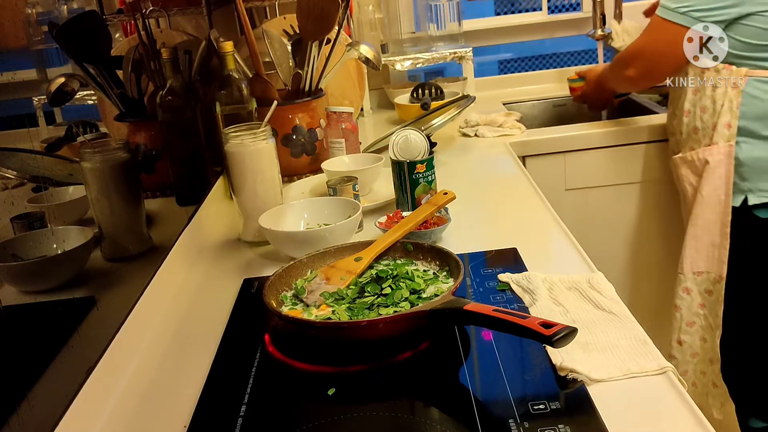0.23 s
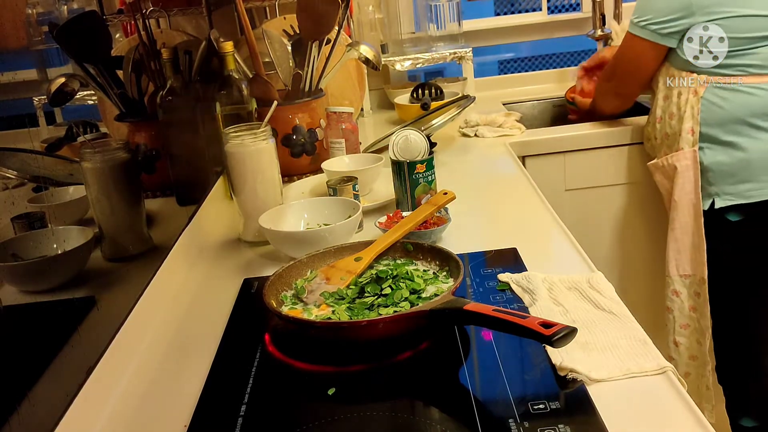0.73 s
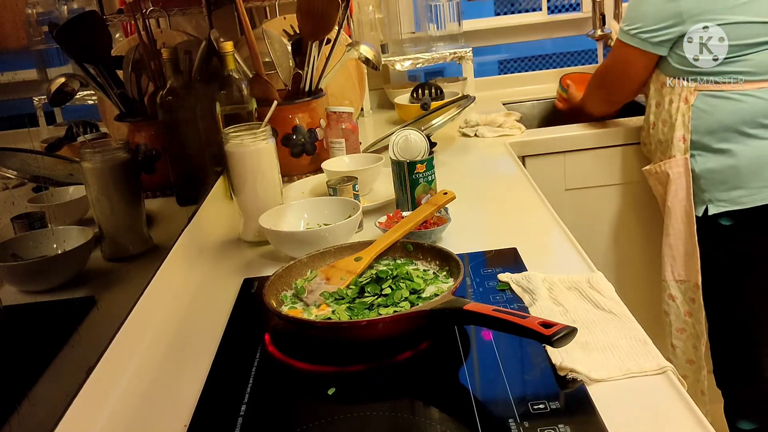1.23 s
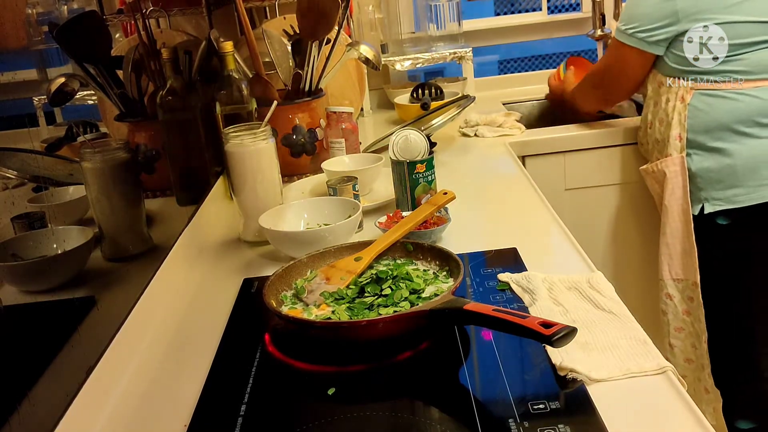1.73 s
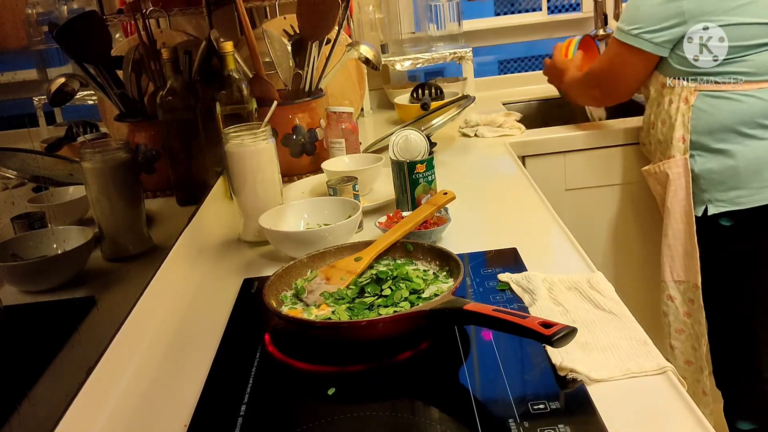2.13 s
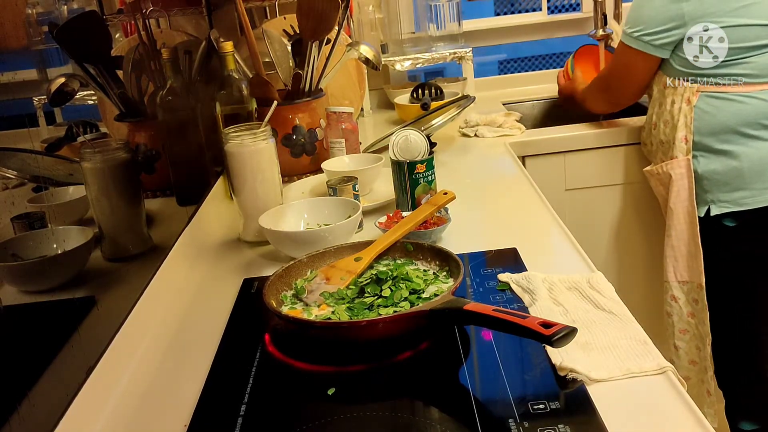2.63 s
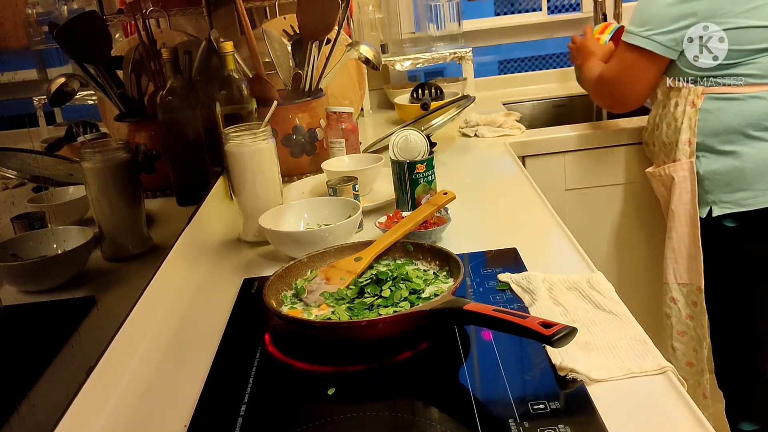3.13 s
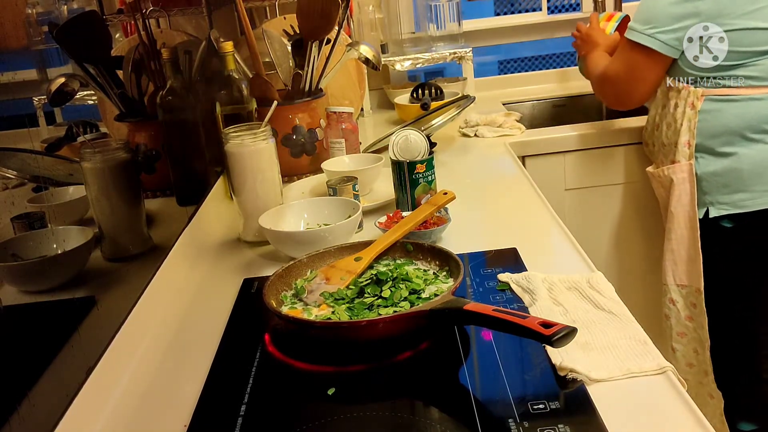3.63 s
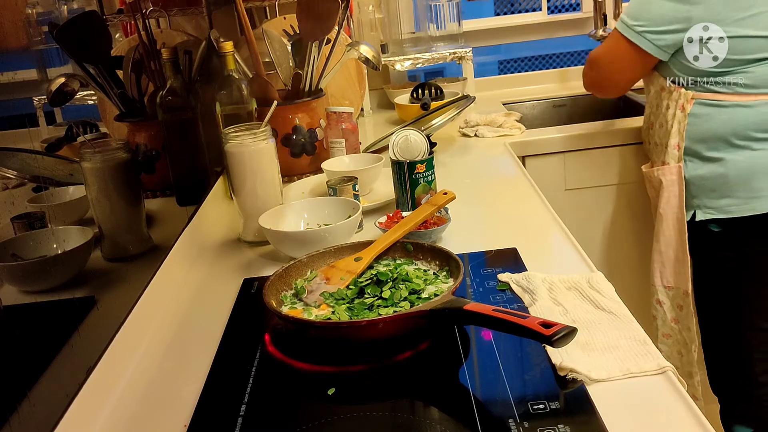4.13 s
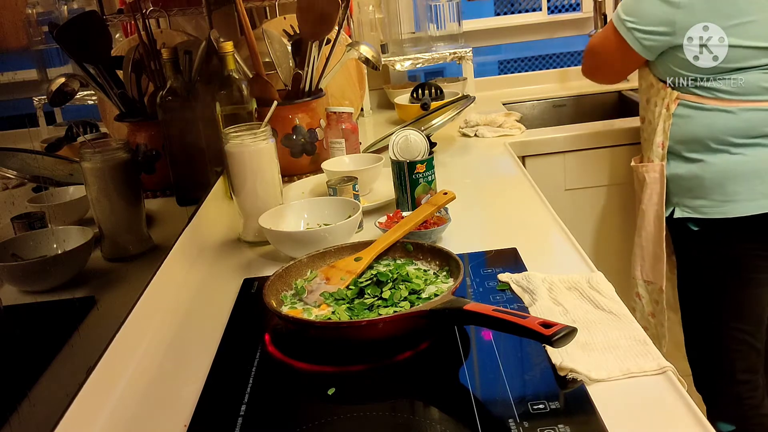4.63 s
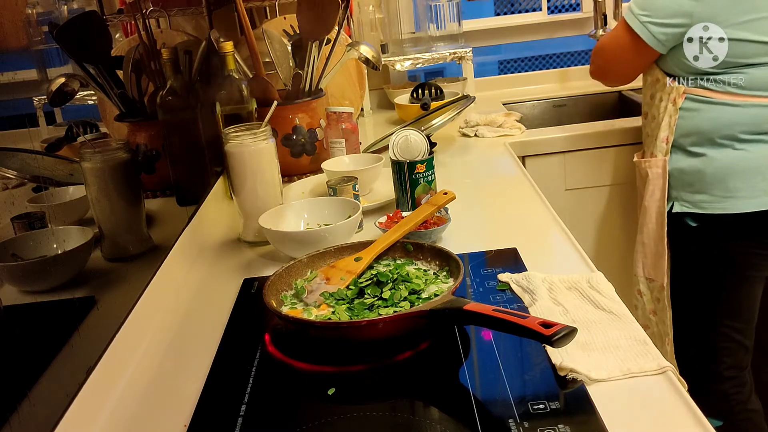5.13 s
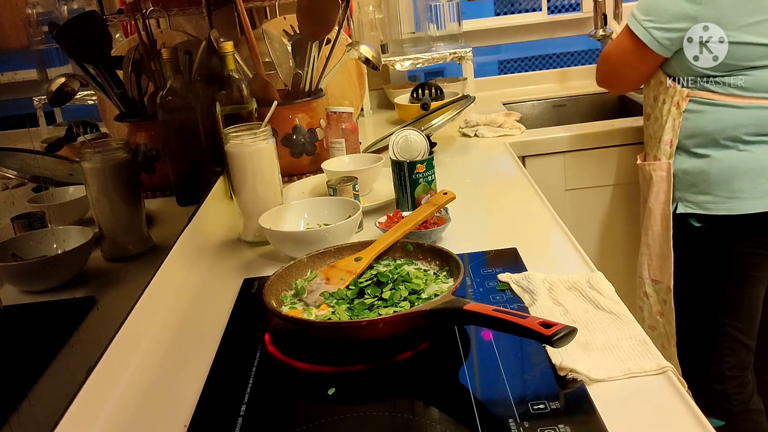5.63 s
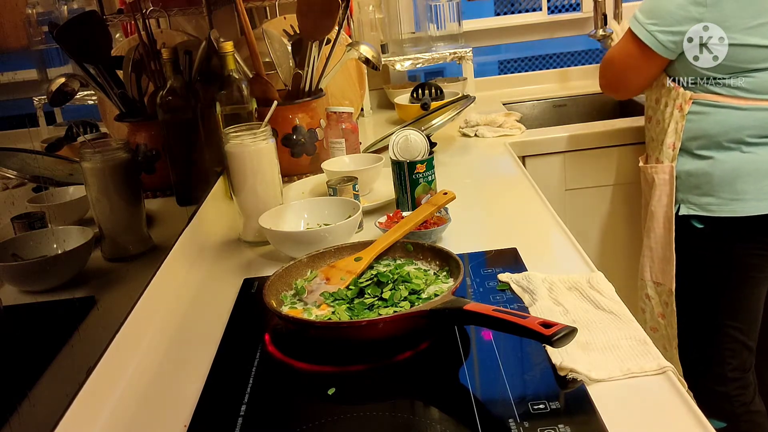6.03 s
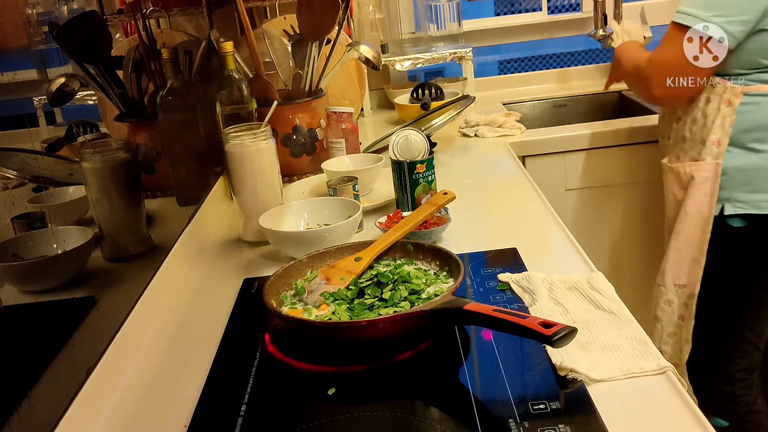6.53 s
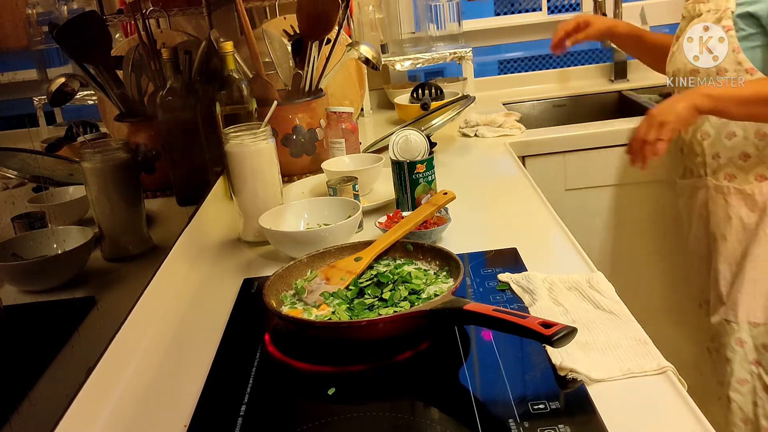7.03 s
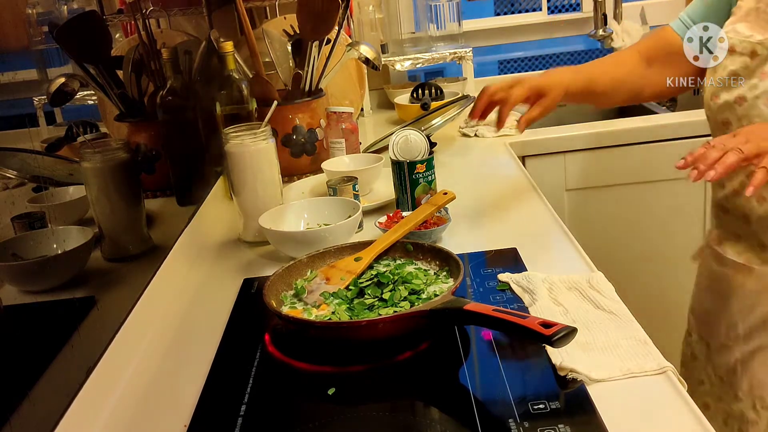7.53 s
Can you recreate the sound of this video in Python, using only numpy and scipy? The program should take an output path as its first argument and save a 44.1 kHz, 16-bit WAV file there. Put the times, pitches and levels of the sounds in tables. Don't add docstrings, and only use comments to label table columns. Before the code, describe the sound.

Fine water spray and coarse splashes surge and dip as hands turn in the stream at a sink, with faint drain gurgle. A sharp, hollow steel knock comes almost at once, then padded cupboard thuds. After the tap closes, quiet hum and airy wash remain, broken by a dish rattling on the counter, short steel clinks and a few faint ticks. Small room, slightly distant stereo microphone, no extreme highs.

```python
import sys
import numpy as np
from scipy import signal
from scipy.fft import rfft, irfft, next_fast_len
from scipy.io import wavfile
from scipy.ndimage import uniform_filter1d

SR = 44100
rng = np.random.default_rng(int(sys.argv[2]) if len(sys.argv) > 2 else 0)


def how_loud(loudness_db):
    steps = np.asarray(loudness_db, float) / 20
    return 10 ** steps


def dump(signal):
    limited = np.clip(np.atleast_2d(signal).T, -1, 1)
    pcm = np.round(limited * 32767).astype(np.int16)
    wavfile.write(sys.argv[1], SR, pcm)


N = 343627


def evened(x):
    return x / np.sqrt(np.mean(x ** 2) + 1e-20)


def read(points, hz):
    f, value = np.transpose(points)
    return np.interp(np.log(hz + 1), np.log(f + 1), value)


def add(mix, start_s, sound):
    part = mix[:, round(start_s * SR):][:, :sound.shape[1]]
    part += sound[:, :part.shape[1]]


def coloured(x, gain):
    size = next_fast_len(x.shape[-1])
    spectrum = rfft(x, size) * gain(np.fft.rfftfreq(size, 1 / SR))
    return irfft(spectrum, size)[..., :x.shape[-1]]


def bell(hz, centre_hz, octaves):
    return np.exp(-.5 * (np.log2((hz + 1) / centre_hz) / octaves) ** 2)


def drift(fastest_hz):
    return evened(coloured(rng.standard_normal(N), lambda hz: (hz > 0) / (1 + (hz / fastest_hz) ** 2)))


def noise(spectrum, grain_db=0., per_s=4000):
    drop_gain = how_loud(grain_db * np.minimum(rng.exponential(1, (2, N)), 4))
    drops = drop_gain * (rng.random((2, N)) < per_s / SR)
    raw = rng.standard_normal((2, N)) * (0.38 + drops)
    return evened(coloured(raw, lambda hz: how_loud(read(spectrum, hz))))


def burst(length, centre_hz, octaves):
    return evened(coloured(rng.standard_normal((2, length)), lambda hz: bell(hz, centre_hz, octaves)))


# (frequency [Hz], lead [rad])
PORT_LEAD = [(50, -.2), (100, -.28), (250, -.6), (600, -.6), (850, .4), (1200, 2.9)]


def port_lead(hz):
    return read(PORT_LEAD, hz)


# (time [s], stream level [dB], share breaking on hands and fruit [0-1])
TAP_FLOW = [(0, -67, 0.5), (.09, -81.5, 0.1), (.24, -52.5, 0.82), (.5, -50, 0.56), (.65, -49.5, 0.4),
            (.82, -59, 0.78), (1.08, -59, .8), (1.18, -53.5, 0.64), (1.44, -49.5, 0.6), (1.55, -61.5, 0.87),
            (1.75, -52, 0.6), (1.965, -56, 0.82), (2.0, -44, 0.51), (2.43, -48, 0.6), (2.91, -59.5, 0.83),
            (2.98, -45.5, 0.58), (3.78, -47, 0.07), (3.95, -84.5, 0.5)]
# (time [s], peak level [dB], rise [s])
GUSHES = [
    (.39, -41, 0.1),
    (.95, -51, 0.16),
    (1.05, -52.5, .12),
    (1.83, -48.5, 0.3),
    (1.996, -40, 0.008),
    (2.28, -46, .05),
    (3.091, -38.5, 0.056),
    (3.98, -50, 0.0064),
]
GUSH_FALL_DB_PER_S = 151


def stream():
    t = np.arange(N) / SR
    s, flow_db, hands = np.transpose(TAP_FLOW)
    db = np.interp(t, s, flow_db)
    for peak_s, peak_db, rise_s in GUSHES:
        rise_db = 20 * (peak_s - t) / rise_s
        fall_db = GUSH_FALL_DB_PER_S * (t - peak_s)
        db = np.maximum(db, peak_db - np.maximum(rise_db, fall_db))
    return db, np.clip(np.interp(t, s, hands), 0, 1)


# (frequency [Hz], density [dB/Hz])
SPRAY_SPECTRUM = [(2060, -46.5), (3500, -20.5), (4270, -21.5), (5340, -14), (6540, 0), (6920, 1),
                  (7660, -2.5), (7960, -19.5), (8070, 3.5), (10500, -44.5), (17800, -120)]
# (frequency [Hz], density [dB/Hz])
SPLASH_SPECTRUM = [(700, -31.5), (1400, -2.5), (2500, -2), (4500, -0.5), (6000, -3), (8000, -8)]
# (frequency [Hz], density [dB/Hz])
GURGLE_SPECTRUM = [(150, -17.5), (300, 2.5), (600, -9), (1000, -7), (1800, -26.5)]
SPLASH_FREE_DB, SPLASH_HANDS_DB = -26.5, -2
GURGLE_DB, GURGLE_FOLLOWS = -65, 0.31
STREAM_DB, DRAINED_S = -47.5, 4.13


def water():
    db, hands = stream()
    wet = np.clip((DRAINED_S - np.arange(N) / SR) / 0.17, 0, 1)
    spray = noise(SPRAY_SPECTRUM, 0.98) * how_loud(db + 1.1 * drift(25))
    splash_db = db + SPLASH_FREE_DB + (SPLASH_HANDS_DB - SPLASH_FREE_DB) * hands
    splash = noise(SPLASH_SPECTRUM, 1.1, 2500) * how_loud(splash_db + 3.0 * drift(6.2))
    gurgle_db = GURGLE_DB + GURGLE_FOLLOWS * (db - STREAM_DB)
    gurgle = noise(GURGLE_SPECTRUM, 1.6, 900) * how_loud(gurgle_db + 0.52 * drift(8))
    return wet * (spray + splash + gurgle)


# (time [s], peak level [dB], centre [Hz], spread
WATER_SLAPS = [(.221, -58, 6700, .65), (.267, -34, 4500, 1.5), (.359, -37.5, 1410, 0.61),
               (.364, -41, 5960, 1.3), (.914, -44.5, 5500, 1.23), (1.038, -48, 4000, 0.51),
               (1.151, -36.5, 6830, 0.46), (1.281, -45, 6800, 0.41), (1.82, -53, 6500, .63),
               (1.955, -35, 6000, 1.), (1.992, -30, 7000, 0.4), (1.996, -37, 1900, 0.3),
               (1.996, -38, 3800, .3), (2.0, -27, 7400, .04), (2.19, -50, 1900, .4), (2.46, -46, 786, .3),
               (3.575, -39.5, 1400, 0.87), (2.361, -32.5, 3500, 1.6), (2.951, -31, 4300, 0.3),
               (2.954, -41.5, 2210, .4), (3.086, -33.5, 6000, 0.33), (3.097, -35, 6800, .4),
               (3.147, -39, 1900, 0.86), (3.745, -31.5, 6960, 0.32), (3.975, -41.5, 6470, 0.54),
               (.62, -25, 505, 1.3), (2.19, -34.5, 450, 0.66)]
# (time [s], peak level [dB], centre [Hz], spread [octaves])
COUNTER_TICKS = [
    (6.3, -58, 6000, .62),
    (5.79, -43.5, 7500, .39),
    (6.678, -54.5, 6900, .45),
    (6.834, -43, 5800, .56),
    (6.87, -57, 4300, 0.63),
    (7.25, -66, 4000, .8),
    (7.066, -51, 7600, 0.39),
    (6.02, -33.5, 5000, 0.53),
]
SLAP_T60_S, TICK_T60_S = 0.19, 0.35


def slaps(rows, t60_s):
    out, t = np.zeros((2, N)), np.arange(6000) / SR
    for s, db, centre_hz, octaves in rows:
        envelope = how_loud(db - 17.5 - 60 * t / t60_s) * np.minimum(t / 0.0028, 1)
        add(out, s - .002, burst(len(t), centre_hz, octaves) * envelope)
    return out


def struck(modes, blows, body, clatter_t60_s, rock_db):
    out, t = np.zeros((2, N)), np.arange(SR // 2) / SR
    hz, mode_db, t60_s = np.transpose(modes)[:, :, None]
    rocking = rng.standard_normal((len(hz), len(t)))
    for _ in range(2):
        rocking = uniform_filter1d(rocking, size=200)
    fading = how_loud(mode_db - 60 * t / t60_s + rock_db * evened(rocking))
    near = fading * np.sin(2 * np.pi * hz * t)
    far = fading * np.cos(2 * np.pi * hz * t - port_lead(hz)) * rng.choice([-1, 1], hz.shape)
    signs = rng.choice([-1, 1], len(hz))
    for s, db, centre_hz, octaves, clatter_db, free_s in blows:
        weights = bell(hz[:, 0], centre_hz, octaves) * signs
        damped = how_loud(-60 * np.maximum(t - free_s, 0) / .055)
        ringing = np.array([weights @ near, weights @ far]) * damped
        colour = lambda f: how_loud(read(body, f)) * bell(f, centre_hz, octaves + 1.6)
        clatter = evened(coloured(rng.standard_normal((2, len(t))), colour))
        sound = ringing + clatter * how_loud(clatter_db - 60 * t / clatter_t60_s)
        add(out, s, how_loud(db) * sound * np.minimum(500 * t, 1))
    return out


# (frequency [Hz], level [dB], t60 [s])
SINK_MODES = [(101.3, -8, .3), (179, -10.5, 0.9), (229, -1, 0.1), (262, -4, .14), (320, 3, 0.15),
              (412, -5, 0.15), (470, -14, 0.083), (506, -14, 0.5), (533, -3, .12), (600, 2, .19),
              (653, -13, 0.089), (703, -13, 0.22), (750, -11, .14), (816.6, -19, 0.4), (880, -15, .12),
              (950, -26, 0.08), (1090, -21, .2), (1190, -15.5, .12), (1140, -12, .08), (1245, -9, 0.18),
              (1300, -10, .09), (1754, -8, .1), (1918, -16, .13), (1920, -32, .9), (2150, -18.5, .08),
              (2370, -22, .1), (2800, -19, .12), (1650, -20, .08), (2050, -29, .1), (2550, -34, .08),
              (3000, -31, .1), (3500, -28, .08), (3860, -36, .08),
              (3215, -27, .15), (3258, -24, .16)]
# (frequency [Hz], density [dB/Hz])
SINK_BODY = [(47, -42.5), (80, -6.5), (303, 0), (375, -30.5), (596, -1), (965, -20), (1240, -4),
             (1480, -18.5), (1860, -7), (2090, -13), (4520, -22.5), (6780, -11), (8070, -26), (10500, -73),
             (17800, -120)]
# (time [s], level [dB], favoured pitch [Hz], spread [octaves], clatter [dB])
SINK_KNOCKS = [(.618, -35, 610, 3.4, -6.5), (.6234, -35.5, 1300, 0.37, -4), (.629, -28.5, 296, 2.6, -5),
               (.6424, -31.5, 560, 1.5, -9), (.622, -24, 3250, 0.05, -43), (.631, -30, 321, .06, -30),
               (.636, -33, 414, .05, -30), (.676, -34, 3215, .005, -40), (.7, -40, 3215, .01, -40),
               (.6523, -32.5, 1260, 0.25, -13), (.666, -29, 1918, 0.04, -33), (.672, -43, 516, 0.75, -3)]
SINK_FREE_S = 0.32


def sink_knocks():
    blows = [(*row, SINK_FREE_S) for row in SINK_KNOCKS]
    return struck(SINK_MODES, blows, SINK_BODY, 0.086, 1.0)


# (time [s], peak level [dB], ring [Hz], t60 [s], rattle re ring [dB])
PANEL_BUMPS = [(.268, -59.5, 1275, 0.51, -26), (.325, -54, 612, .15, -17), (.357, -47, 1390, .06, -7),
               (.37, -46, 304, 0.2, 2.5), (1.531, -53, 1054, .08, 2), (2.2, -49, 826, 0.14, -12),
               (2.44, -48, 500, .15, -8), (2.462, -49, 835, 0.11, -11), (3.575, -47, 660, 0.14, -7),
               (3.56, -41, 262, 0.28, -7), (2.97, -52, 218, 0.27, 0), (1.178, -48, 174.3, 0.26, -12.5),
               (1.24, -47, 162, 0.37, -3), (1.649, -34, 173.6, 0.15, -21), (2.02, -39, 237, 0.14, -10),
               (2.077, -36.5, 82.2, 0.34, -19), (2.176, -41, 234, 0.089, 0), (2.18, -45, 603, 0.19, -2),
               (2.2, -48, 36, 0.39, -23), (2.436, -26.5, 122.5, 0.14, -24.5), (2.457, -42, 65, 0.12, -13),
               (2.86, -46, 72.8, 1, -27), (3.079, -52.5, 151, 0.097, -7), (3.564, -38, 166.4, 0.21, -1.5),
               (3.568, -30, 88.1, 0.21, -13), (3.621, -37, 111.8, 0.098, -18), (4.763, -41, 72, 0.15, -26),
               (5.042, -33, 164.3, 0.083, -7), (5.348, -40, 168.3, 0.17, -10),
               (6.024, -40, 161, 0.21, -4.5), (7.328, -46.5, 242, 0.1, -0.5)]
RATTLE_ABOVE_HZ = 110


def bumps():
    out, t = np.zeros((2, N)), np.arange(12000) / SR
    for s, db, ring_hz, t60_s, rattle_db in PANEL_BUMPS:
        rattle = burst(len(t), ring_hz + RATTLE_ABOVE_HZ, 1.0) * how_loud(rattle_db - 60 * t / 0.19)
        phases = [[0], [np.pi / 2 - port_lead(ring_hz)]]
        ring = np.sin(2 * np.pi * ring_hz * t + phases)
        envelope = how_loud(db - 3.0 - 60 * t / t60_s) * (1 - np.exp(-t / 0.0052))
        add(out, s - .005, (ring + rattle) * envelope)
    return out


# (frequency [Hz], level [dB], t60 [s])
DISH_MODES = [(644, -15, .04), (714, -4, .12), (802, -7, .08), (860, -5, .08), (1050, -12, .08),
              (1160, -11, .06), (1750, -12, .08), (930, -6, 0.1), (986, -2, 0.12), (1094, -7, .1),
              (1900, -3, 0.12), (2620, -20, .06), (520, -8, .1), (3310, -14, .3), (3450, -22, .07)]
# (time [s], level [dB], favoured pitch [Hz], spread [octaves], clatter [dB])
DISH_SETS = [(4.99, -52.5, 2200, .4, -10), (4.993, -46, 800, 0.45, -10.5), (5.022, -55, 800, .3, -11),
             (5.037, -46.5, 1450, 0.96, -1), (5.041, -36, 900, .3, -13), (5.055, -38, 930, .2, -18),
             (5.042, -47, 3300, .1, -12), (5.058, -46, 3300, .15, -9), (5.064, -53, 1900, .1, -12),
             (5.1, -46, 900, .2, -18), (5.079, -33, 950, 0.22, -22), (5.111, -46.5, 1010, .17, -14.5),
             (5.126, -48, 1050, .2, -18), (5.142, -43, 940, 0.098, -21), (5.16, -51, 950, .3, -18),
             (5.185, -53, 950, .3, -20), (5.3, -50, 900, 1.5, 0), (5.312, -47, 750, .4, -9),
             (5.328, -52, 900, .2, -14), (5.358, -48, 1750, .1, -14), (6.016, -48.5, 760, 3.3, -0.5),
             (6.02, -41, 715, .2, -13), (6.04, -41, 850, 0.4, -13), (6.058, -48, 720, 0.55, -8),
             (6.075, -48, 750, .25, -12), (6.09, -50, 700, 0.25, -11)]
# (frequency [Hz], density [dB/Hz])
COUNTER_CLATTER = [(180, -36), (300, -4), (843, -2), (967, -6), (3390, -17.5), (3680, -19.5), (6470, -12.5),
                   (6750, 0), (8070, -19.5), (10500, -57), (17800, -120)]
DISH_FREE_S = 0.014


def dish_sets():
    blows = [(*row, DISH_FREE_S) for row in DISH_SETS]
    return struck(DISH_MODES, blows, COUNTER_CLATTER, 0.22, 2.0)


# (frequency [Hz], level [dB], t60 [s])
BLADE_MODES = [(1800, -8, 0.084), (2353, -4.5, 0.5), (2395, -13, .2), (2750, 1, 0.16), (2318, -13, .2),
               (4050, -10, .17), (3300, -9.5, .3), (4350, -10, 0.1), (4290, -7, .4), (4430, -12.5, .15),
               (4540, -8, .25), (4680, -9, .25), (5017, -9, .16), (4974, -12, .5), (5250, -20, .15),
               (5490, -15, .3), (1922, -3, .15), (5835, -13, .25), (6300, -12, .3), (6422, -8, 0.38),
               (6578, -4.5, 0.23), (6686, -12, .22), (6895, -6.5, 0.2), (7050, -21, .3), (7168, -12, .3),
               (7500, -5, 0.27), (7740, -7, .2)]
# (time [s], level [dB], favoured pitch [Hz], spread [octaves], time to next contact [s])
CUTLERY_CLINKS = [(5.092, -51, 2340, .06, 0.02), (5.132, -60, 2340, .06, 0.017),
                  (5.162, -68, 2340, .06, .008), (5.272, -55, 2350, 0.11, 0.015),
                  (5.268, -61, 4350, .04, .015), (5.3, -53, 5490, .05, .03), (5.312, -61, 2350, .06, .012),
                  (5.346, -42.5, 4400, 0.2, .035), (5.347, -48, 2500, .5, 0.039),
                  (5.355, -33, 5017, 0.008, 0.024), (5.346, -43.5, 7500, .06, .055),
                  (5.35, -39, 6460, .025, 0.042), (5.355, -41, 2353, .03, .01),
                  (5.373, -43, 2353, .05, 0.035), (5.3, -48, 3300, .03, .035),
                  (5.36, -36, 6500, .025, 0.032), (5.386, -50.5, 4700, 0.37, .1),
                  (5.39, -54, 7100, 0.1, .04), (5.412, -49.5, 6400, .06, .09), (5.42, -50, 4200, .1, .1),
                  (5.428, -43, 6578, 0.036, 0.015), (5.43, -48, 2353, 0.062, .06),
                  (5.44, -51.5, 5100, 0.13, .11), (5.525, -67, 2353, .06, .04),
                  (5.66, -58.5, 2353, 0.12, .065), (5.655, -62, 4350, .05, .05),
                  (5.75, -72, 2353, .06, .05), (5.845, -67, 2353, .08, .03), (5.972, -60.5, 2353, .1, .021),
                  (6.016, -47, 3300, .05, 0.073), (6.019, -41.5, 6895, 0.031, .008),
                  (6.03, -29.5, 6895, 0.01, 0.012), (6.02, -46.5, 1922, 0.05, .03),
                  (6.052, -38, 4350, 0.015, .085), (6.057, -41.5, 2353, .04, 0.08),
                  (6.19, -76, 2353, .05, .03), (6.078, -50, 4050, 0.03, .015), (6.03, -46, 4974, .01, 0.16),
                  (6.095, -48.5, 4974, .01, .06), (6.075, -46, 6690, .03, .07),
                  (6.025, -50, 7740, .03, .16)]
CLINK_CLATTER_DB, CLATTER_DB_PER_HALVING = 4, -3.5


def cutlery_clinks():
    blows = []
    for s, db, hz, octaves, free_s in CUTLERY_CLINKS:
        clatter_db = CLINK_CLATTER_DB - CLATTER_DB_PER_HALVING * np.log2(octaves)
        blows.append((s, db, hz, octaves, clatter_db, free_s))
    return struck(BLADE_MODES, blows, COUNTER_CLATTER, .16, 2.2)


# (frequency [Hz], t60 [s])
ROOM_DECAY = [(100, 0.37), (500, 0.23), (2000, 0.3), (8000, 0.23)]


def room(x, wet_db):
    taps = np.zeros((2, SR // 2))
    at = np.arange(120, SR // 2 - 20, 20) + rng.integers(0, 20, (2, (SR // 2 - 121) // 20))
    np.put_along_axis(taps, at, rng.choice([-1., 1.], at.shape), 1)
    hz, t, z = signal.stft(taps, SR, nperseg=256)
    decay = how_loud(-60 * t / read(ROOM_DECAY, hz)[:, None])
    tail = signal.istft(z * decay, SR, nperseg=256)[1]
    tail = tail / np.linalg.norm(tail[0])
    return x + how_loud(wet_db) * signal.fftconvolve(x, tail, axes=1)[:, :N]


# (time [s], level [dB])
HUM_LEVEL = [(0, -48.5), (.05, -43.5), (.59, -43.5), (.67, -31.5), (.8, -44.5), (1.55, -45.5),
             (1.69, -40.5), (1.84, -47.5), (2.03, -45.5), (2.12, -39), (2.36, -48), (2.45, -40),
             (2.56, -51.5), (2.69, -46.5), (3.43, -43.5), (3.53, -49), (3.61, -39.5), (3.76, -45)]
HUM_HZ = 100.1


def hum():
    turns = np.cumsum(HUM_HZ + 0.24 * drift(0.51)) / SR
    db = np.interp(np.arange(N) / SR, *np.transpose(HUM_LEVEL)) - 3.0
    return np.sqrt(2) * np.sin(2 * np.pi * turns) * how_loud(db + 0.26 * drift(9.8))


# (frequency [Hz], density [dB/Hz])
AIR_SPECTRUM = [(90, -20), (130, -2.5), (184, 0.5), (250, -2.5), (340, -4.5), (470, -6.5), (540, -6.5),
                (605, -2.5), (680, -10.5), (850, -11.5), (1500, -20.5), (3400, -32), (5270, -32),
                (6700, -14.5), (7300, -16.5), (8070, -34.5)]
# (frequency [Hz], density [dB/Hz])
RUMBLE_SPECTRUM = [(15, -19.5), (30, -2.5), (60, -3.5), (80, 4.5), (100, 5), (125, -1), (170, -10.5),
                   (250, -32.5)]
WASH_DB, HISS_DB, RUMBLE_DB = -59.5, 2, -57.5
HISS_GAIN_DB, RUMBLE_GAIN_DB = 4.5, 4.5


def background():
    flow = how_loud(stream()[0] - STREAM_DB)
    running = np.minimum(uniform_filter1d(flow, size=14000), 1.5)
    air = noise(AIR_SPECTRUM)
    hiss = coloured(air, lambda hz: 1 / (1 + (1800 / (hz + 1)) ** 4))
    lifted_hiss = hiss * how_loud(HISS_DB + HISS_GAIN_DB * running + .7 * drift(6))
    wash = (air - hiss + lifted_hiss) * how_loud(WASH_DB + .5 * drift(3))
    rumble_db = RUMBLE_DB + RUMBLE_GAIN_DB * running + 0.65 * drift(3.1)
    rumble = noise(RUMBLE_SPECTRUM) * how_loud(rumble_db)
    return wash + rumble + hum()


def scene():
    sink = room(sink_knocks(), -5)
    dish = room(dish_sets(), -5)
    cutlery = room(cutlery_clinks(), -15)
    bursts = slaps(WATER_SLAPS, SLAP_T60_S) + slaps(COUNTER_TICKS, TICK_T60_S)
    return water() + room(bursts, -3.0) + sink + room(bumps(), -2.5) + dish + cutlery + background()


def roll_off(x):
    return signal.sosfilt(signal.butter(12, 8220, fs=SR, output="sos"), x)


# (frequency [Hz], likeness [0-1])
PORT_LIKENESS = [(45, 0.54), (100, 0.98), (165, 1), (270, 0.51), (400, 0.9), (600, 0.67), (850, 0.077),
                 (2000, 0.13), (7000, 0.12), (8000, .13)]
# (frequency [Hz], left minus right [dB])
PORT_LEAN = [(100, 5.5), (165, 0), (370, 3), (570, -.5), (850, -1.5), (1200, -5.5), (1700, -15.5),
             (2400, -7.5), (3200, 0), (4400, 0), (5500, 3.5), (6300, 8.5), (6900, 13), (7500, -3.5)]
EDGE_HZ = 7933


def record(dry):
    same = lambda hz: np.clip(read(PORT_LIKENESS, hz), 0, 1)
    edge = lambda hz: 2 / (1 + np.exp(np.clip((hz - EDGE_HZ) / 35, -50, 50)))
    shared = coloured(dry[0], lambda hz: same(hz) * np.exp(-1j * port_lead(hz)))
    own = coloured(dry[1], lambda hz: np.sqrt(1 - same(hz) ** 2))
    left = coloured(dry[0], lambda hz: edge(hz) / np.sqrt(1 + how_loud(-2 * read(PORT_LEAN, hz))))
    right = coloured(shared + own, lambda hz: edge(hz) / np.sqrt(1 + how_loud(2 * read(PORT_LEAN, hz))))
    return roll_off(np.array([left, right]))


dry = scene()
out = record(dry)
dump(out)
```